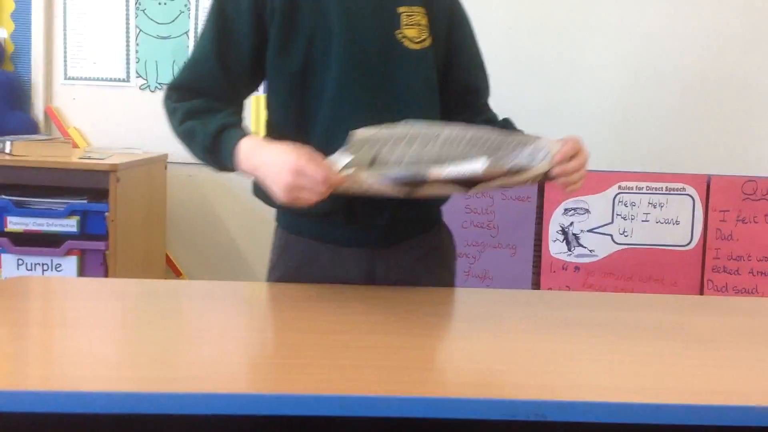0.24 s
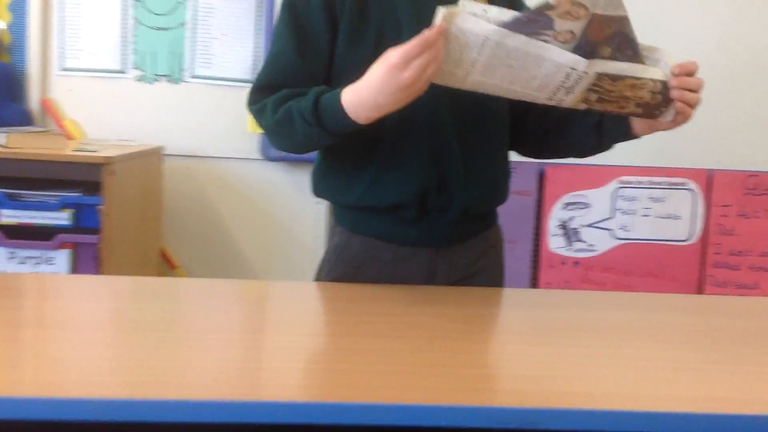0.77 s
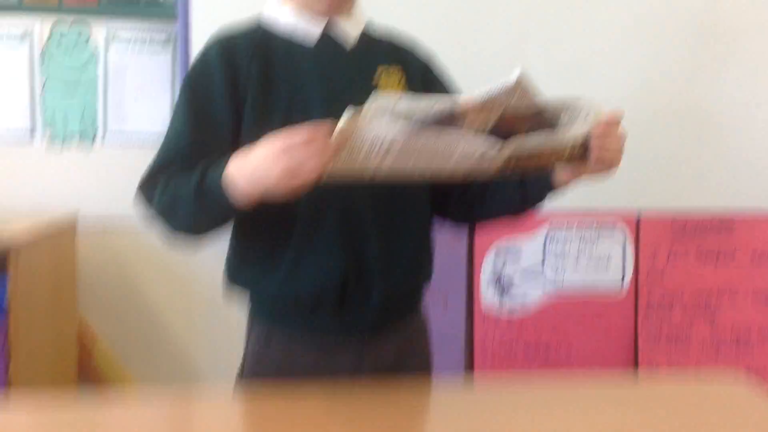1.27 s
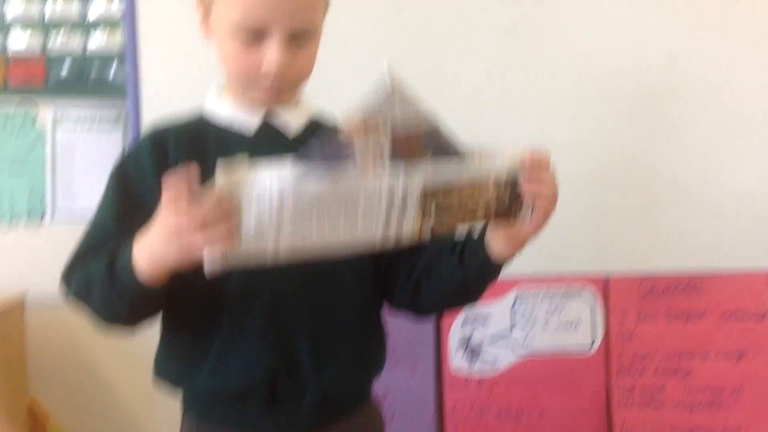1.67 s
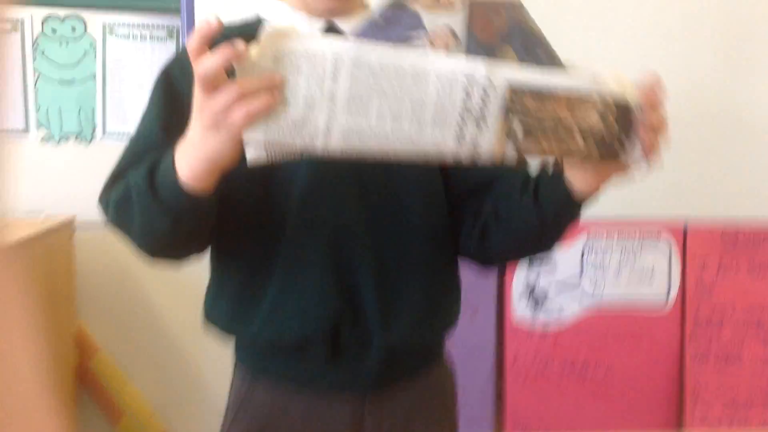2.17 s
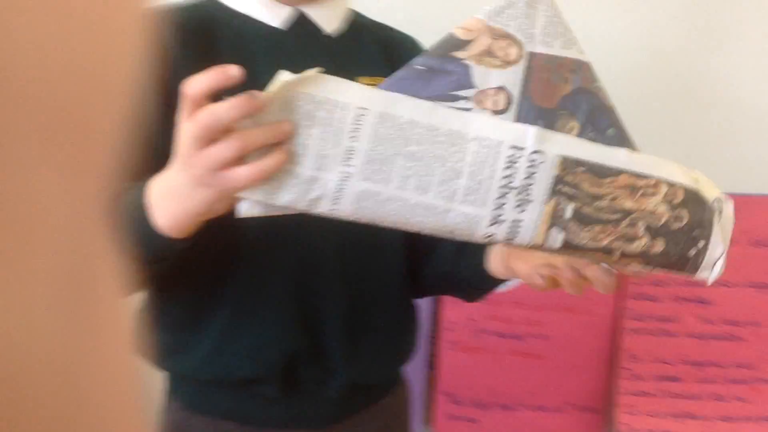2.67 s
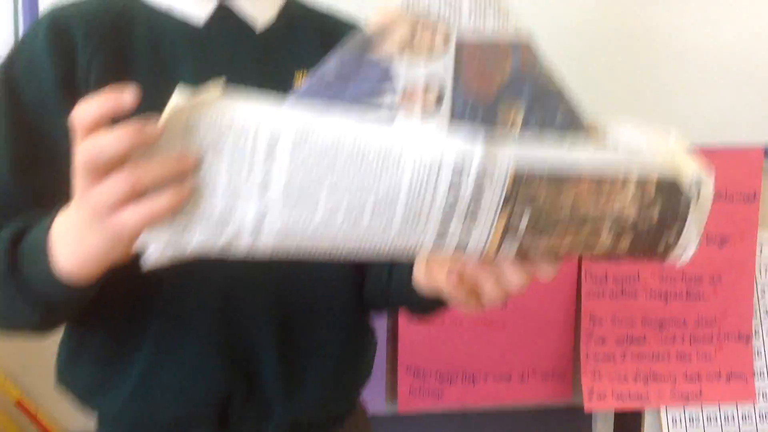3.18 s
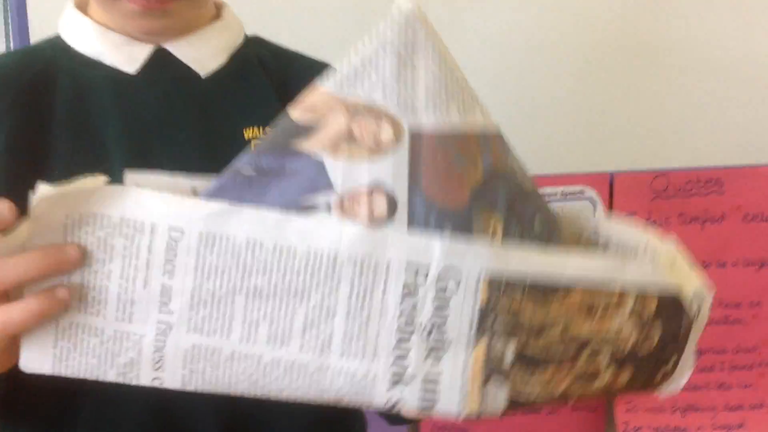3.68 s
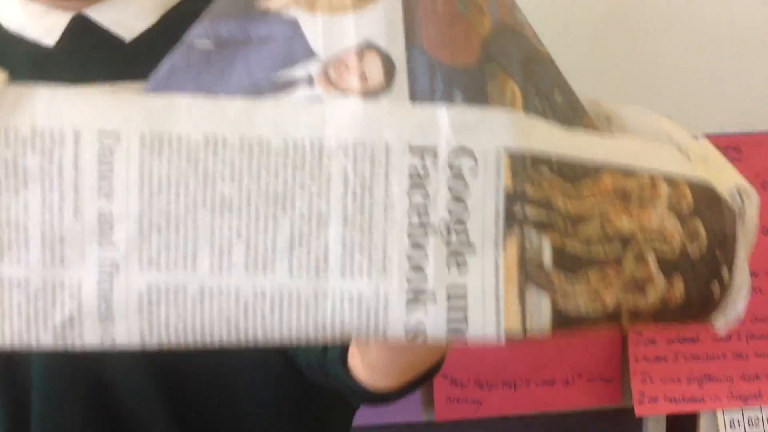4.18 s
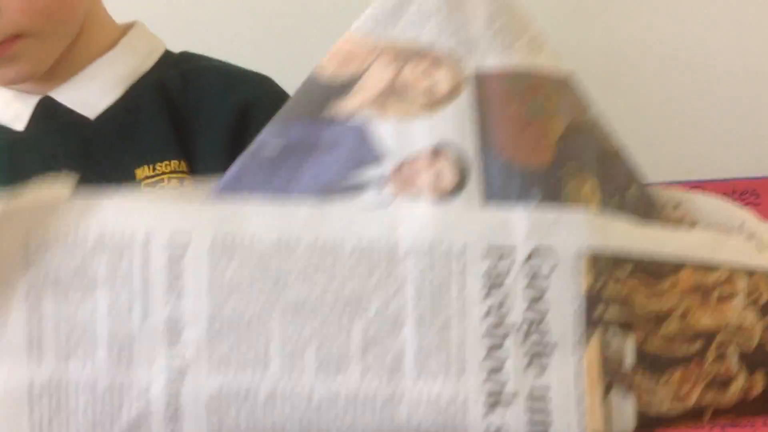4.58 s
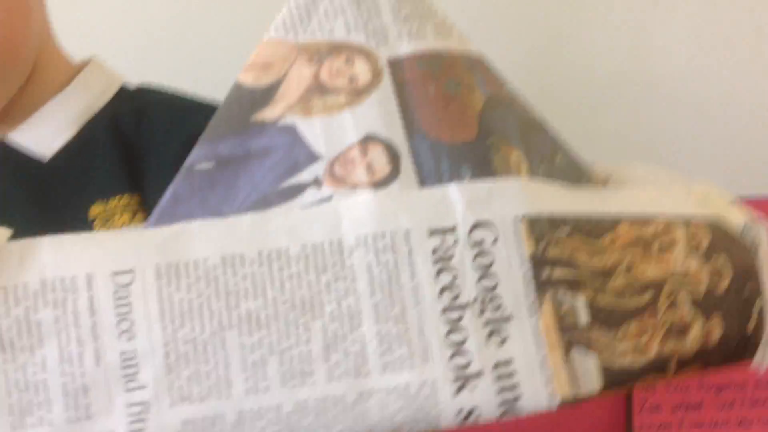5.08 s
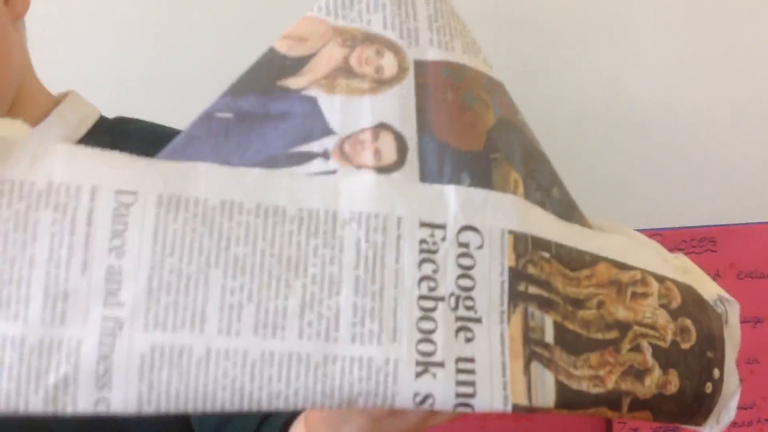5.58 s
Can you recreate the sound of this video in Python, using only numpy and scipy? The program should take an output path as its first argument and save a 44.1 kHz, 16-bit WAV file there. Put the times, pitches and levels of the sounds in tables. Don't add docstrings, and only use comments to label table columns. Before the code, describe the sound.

Crisp newspaper rustle and snapping creases build to a hard crackling bend, then dull and settle, amid finger bumps on the recorder and faint room hum.

```python
import sys
import numpy as np
from scipy import signal
from scipy.fft import rfft, irfft, next_fast_len
from scipy.io import wavfile
from scipy.ndimage import uniform_filter1d

SR = 44100
rng = np.random.default_rng(int(sys.argv[2]) if len(sys.argv) > 2 else 0)


def nominal_scale(level):
    x = np.asarray(level, float) / 20
    return 10 ** x


def wrap_up_sound(samples):
    columns = np.atleast_2d(samples).T
    tamed = np.clip(columns, -1, 1)
    steps = np.round(tamed * 32767).astype(np.int16)
    wavfile.write(sys.argv[1], SR, steps)


N = 257544

# (time [s], peak level [dB], ringing
# pitch [Hz])
CREASE_SNAPS = [(0.049, -35, 6420), (0.1341, -30, 6590), (0.156, -29, 8200), (0.1615, -32, 6420),
                (0.269, -35, 8600), (0.7158, -36.5, 8100), (0.804, -37, 3800), (0.881, -36.5, 2840),
                (0.9562, -29.5, 2930), (0.9907, -36, 3700), (1.015, -26.5, 3950), (1.173, -34, 2930),
                (1.3012, -32, 3060), (1.324, -24.5, 3140), (1.3318, -27, 4910), (1.572, -31.5, 7500),
                (1.6255, -30, 1940), (1.6835, -32, 7110), (1.7975, -36.5, 2450), (1.8482, -32, 3240),
                (1.865, -35, 6160), (1.9307, -38, 3400), (1.971, -27, 6000), (2.012, -26.5, 2870),
                (2.0344, -24, 7360), (2.1093, -34, 4260), (2.4374, -34, 3100), (2.4573, -30.5, 4740),
                (2.4613, -18.5, 5500), (2.507, -29, 6550),
                (2.6482, -45, 2820), (2.715, -47, 3000), (2.798, -44, 2430), (2.81, -41, 2500),
              (2.8992, -43, 6550), (3.103, -32, 3350), (3.138, -33, 3700), (3.1778, -35, 2580),
              (3.2223, -21.5, 5140), (3.226, -24.5, 5100), (3.2695, -29.5, 3790), (3.2905, -29, 2250),
              (3.303, -30, 6290), (3.3216, -24, 3790), (3.395, -20, 4690), (3.399, -23, 3860),
              (3.4206, -27, 3530), (3.4352, -12.5, 4450), (3.5129, -14.5, 5900), (3.525, -21, 7920),
              (3.5517, -29, 5990), (3.628, -33, 5000), (3.654, -32, 3010), (3.66, -30.5, 6890),
              (3.6962, -33, 4950), (3.7295, -35, 5730), (3.747, -32, 5200), (3.7777, -31, 5340),
              (3.8018, -35, 4910),
                (3.8824, -25, 3060), (3.8848, -20, 5800), (3.9063, -21, 3450), (3.9157, -24, 3920),
                (3.9209, -21, 5170), (3.947, -28, 2840), (4.0105, -40, 3360), (4.0821, -38, 1690),
                (4.0979, -36, 2020), (4.1114, -16, 4130), (4.487, -44, 3750), (4.5399, -25.5, 2970),
                (4.587, -33.5, 3630), (4.8465, -42, 1460), (5.4791, -30.5, 3000), (5.511, -24, 3120),
                (5.521, -44, 1510), (5.5371, -29, 3570), (5.6368, -38, 3420)]
# (peak time [s], strength [dB],
# time to swell by 10 dB [s], time to fade by 10 dB [s])
SHEET_STROKES = [(0.0, -46, .05, .13), (0.136, -47, .004, .15), (0.268, -46.5, .06, .075),
                 (0.398, -52, .03, .18), (0.608, -55, .004, .6), (0.717, -51, .004, .2),
                 (0.805, -56, .03, .11), (0.957, -52, .004, .15), (1.017, -43.5, .004, .07),
                 (1.178, -49, .08, .2), (1.302, -46, .004, .1), (1.33, -41, .02, .062), (1.53, -58, .2, .2),
                 (1.646, -45, .025, .12), (1.811, -47, .07, .12), (1.972, -52, .004, .15),
                 (2.036, -48, .04, .08), (2.11, -55, .03, .2), (2.27, -52, .15, .15), (2.4, -59, .1, .1),
                 (2.464, -43.5, .012, .085), (2.66, -64, .15, .2),
                 (2.815, -58, .015, .14), (2.91, -57, .08, .08), (3.065, -50, .035, .5),
                (3.19, -52, .05, .05), (3.283, -42, .08, .3), (3.397, -43, .02, .1),
                (3.437, -36, .004, .055), (3.505, -46, .03, .05), (3.515, -42, .004, .1),
                (3.6, -51, .05, .05), (3.665, -51, .04, .12), (3.76, -49.5, .1, .3), (3.884, -41, .01, .05),
                (3.915, -39, .02, .075), (4.112, -48, .006, .085), (4.31, -55, .08, .045),
                (4.43, -55.5, .07, .15), (4.555, -57, .04, .14), (4.81, -52, .09, .1),
                (4.87, -53, .07, .09), (5.09, -60, .08, .1), (5.189, -54.5, .08, .055),
                (5.365, -56, .09, .06), (5.522, -57, .04, .12)]
# (time [s], treble level [dB])
FACING = [(0.0, 3), (0.9, 4), (0.96, -7), (1.02, 4), (1.3, 1), (2.3, 5), (2.45, -9), (2.95, -2),
          (3.07, -19), (3.27, -19), (3.44, -4), (3.53, 5), (3.69, 1), (3.9, -18), (4.08, -25), (4.112, -5),
          (4.18, -24), (5.84, -32)]
# (frequency [Hz], level [dB per Hz])
SHEET_COLOUR = [(710, -44), (1200, -21), (1370, -13.5), (1730, -2), (3480, 2.5), (4080, 1.5), (4920, 1),
                (6650, -5.5), (10000, -31.5), (13000, -53), (22000, -120)]
# (frequency [Hz], level [dB per Hz])
FIZZ_COLOUR = [(4120, -30), (7000, -10.5), (9880, -13.5), (11600, -13.5), (14800, -14), (15600, -30),
               (16400, -54)]
# (time [s], level [dB])
HAND_SHADE = [
    (1.85, -1.5),
    (2.0, -11),
    (2.6, -18),
    (3.4, -18),
    (3.55, -1.5),
    (3.8, -14),
]
# (time [s], flex peak level [dB], start pitch [Hz], ring [cycles], tick peak level [dB])
CASE_SLAPS = [(1.633, -17, 850, 0.6, -22), (1.6378, -1, 1020, 0.4, -10), (1.6395, -15, 520, 0.7, -14),
              (1.6508, -16.5, 1160, 0.55, -5), (1.6648, -6, 885, 0.4, -13), (1.8152, -20, 800, .5, -38),
              (1.8169, -17, 270, 0.7, -35), (2.3387, -13.5, 660, 0.75, -15), (3.6072, -30, 1500, .3, -22),
              (3.6095, -7.5, 1700, 0.45, 1.5), (3.6101, -18.5, 170, 1.05, -40),
              (4.989, -37, 1900, 2.4, -62)]
# (time [s], flex peak level [dB], start pitch [Hz], ring [cycles])
CASE_TAPS = [(0.52, -40, 900, .4), (1.048, -36, 305, 0.5), (1.4958, -30.5, 1270, 0.3),
             (1.608, -33.5, 515, 1.1), (1.63, -30, 800, .6), (1.6615, -25, 1300, 0.8),
             (1.667, -25.5, 303, 0.72), (1.793, -36, 293, 2.2), (1.8117, -25, 327, 0.37),
             (2.35, -38, 330, 1.1), (2.583, -42.5, 262, 0.5), (2.94, -43, 160, 1.6), (3.166, -43, 2500, .6),
             (3.1845, -36, 2210, 0.78), (3.191, -42, 2300, .6), (3.2097, -36, 450, 1.1),
             (3.214, -25.5, 438, 0.69), (3.219, -28, 161, 2.1), (3.3402, -27, 1100, 0.28),
             (3.3596, -26.5, 915, 0.31), (3.3738, -34, 900, 0.65), (3.39, -27.5, 1100, 0.25),
             (3.432, -24, 1080, 0.2), (3.4412, -24.5, 1010, 0.21), (3.4463, -24.5, 1000, 0.27),
             (3.575, -25, 576, 0.27), (3.5809, -24.5, 920, 0.2), (3.5895, -40, 3000, .4),
             (3.599, -23, 570, 1.7), (5.777, -49.5, 168.5, 0.86)]
# (time [s], rumble level [dB])
GRIP_PRESSURE = [
    (0.0, -61),
    (0.5, -66),
    (1.0, -62),
    (2.2, -62),
    (2.64, -66),
    (2.95, -62),
    (3.45, -57),
    (3.7, -65),
    (5.84, -68),
]
# (frequency [Hz], level [dB per Hz])
RUMBLE_COLOUR = [(24, -56), (40, 1), (145, -11.5), (184, -0.5), (215, 4.5), (301, 1.5), (391, -0.5),
                 (900, -3.5), (1170, -29), (1980, -120)]
# (frequency [Hz], t60 [s])
ROOM_DECAY = [(500, 0.37), (2000, .3), (5000, 0.24), (10000, 0.25), (16000, 0.24)]
# (frequency [Hz], level [dB per Hz])
STILL_COLOUR = [(25, -15), (40, -13), (70, -16), (150, -3), (210, -9), (530, -10), (1100, -13.5),
                (2700, -12.5), (4700, -14.5), (9000, -19.5), (15000, -21.5), (16400, -13.5)]
# (frequency [Hz], level [dB])
MIC_RESPONSE = [(30, -30), (70, -14), (130, -3), (200, 0), (15100, 0), (15500, -24), (16300, -28),
                (16700, -70), (22050, -90)]

USUAL_DB = -52


def evened(x):
    return x / np.sqrt(np.mean(x ** 2) + 1e-20)


def read(points, hz):
    f, value = np.transpose(points)
    return np.interp(np.log(hz + 1), np.log(f + 1), value)


def follow(points, s):
    return np.interp(s, *np.transpose(points))


def add(mix, s, sound):
    part = mix[round(s * SR):][:len(sound)]
    part += sound[:len(part)]


def coloured(x, points):
    size = next_fast_len(len(x))
    gain = nominal_scale(read(points, np.fft.rfftfreq(size, 1 / SR)))
    return evened(irfft(rfft(x, size) * gain, size)[:len(x)])


def band(x, lo_hz, hi_hz):
    sos = signal.butter(2, [lo_hz, min(hi_hz, .45 * SR)], "band", fs=SR, output="sos")
    return signal.sosfilt(sos, x)


def grains(per_s, spread_db, ring_s, smooth, clump_db):
    size = nominal_scale(spread_db * np.minimum(rng.exponential(1, N), 4))
    slips = size * (rng.random(N) < per_s / SR)
    puffs = evened(signal.lfilter([1], [1, -np.exp(-1 / (ring_s * SR))], slips))
    clumps = evened(uniform_filter1d(uniform_filter1d(rng.standard_normal(N), 500), 500))
    return (puffs + smooth) * nominal_scale(clump_db * clumps) * rng.standard_normal(N)


def stroke_strength(pace):
    t = np.arange(0, N + 64, 64) / SR
    s, db, swell_s, fade_s = np.transpose(SHEET_STROKES)[:, :, None]
    drop_db = 10 * pace * np.maximum((s - t) / swell_s, (t - s) / fade_s)
    power = nominal_scale(2 * (db - drop_db)).sum(0)
    return np.interp(np.arange(N) / SR, t, 10 * np.log10(power + 1e-12))


def snaps():
    rows = CREASE_SNAPS
    out, t = np.zeros(N), np.arange(1500) / SR
    noise = rng.standard_normal((len(rows), 1501))
    motion_db = stroke_strength(1) - USUAL_DB
    for (s, db, hz), draws in zip(rows, noise):
        chance, hiss = draws[0], draws[1:]
        facing_db = follow(FACING, s)
        treble_db = -12 + 1.05 * facing_db
        body_db = -18 - 4.5 * np.log2(hz / 4000) - .25 * (db + 30) - .28 * facing_db
        shiver_db = -19 + 2.5 * chance + .55 * motion_db[round(s * SR)]
        decay = np.exp(-t / 0.0021) + nominal_scale(shiver_db + 9.5) * np.exp(-t / 0.0087)
        burst = hiss * decay + 7.7 * (t == 0)
        ring = np.sin(2 * np.pi * hz * t) * np.exp(-t * hz / 2.6)
        edge_hz = 9400 + 105 * treble_db
        wide = band(band(burst, 1400, edge_hz), 1400, edge_hz)
        top = band(band(burst, 7500, 15000), 7500, 15000)
        low = band(burst, 930, 1600)
        wide, top, low = (part / abs(part).max() for part in (wide, top, low))
        crease = 1.15 * ring + 1.065 * wide + nominal_scale(treble_db + 5.4) * top + nominal_scale(body_db) * low
        add(out, s, nominal_scale(db) * crease)
    return out


def rustle():
    strength_db = stroke_strength(1)
    facing_db = follow(FACING, np.arange(N) / SR)
    treble_db = facing_db + stroke_strength(pace=1.65) - strength_db
    body_db = -9.5 - .4 * (strength_db - USUAL_DB) + .07 * facing_db
    slips = grains(per_s=330, spread_db=3.0, ring_s=.0008, smooth=1.9, clump_db=1.3)
    middle = coloured(slips, SHEET_COLOUR)
    top = nominal_scale(treble_db) * coloured(slips, FIZZ_COLOUR)
    low = nominal_scale(body_db) * evened(band(slips, 410, 1835))
    return nominal_scale(strength_db) * (middle + top + low)


def knocks():
    out, t = np.zeros(N), np.arange(2000) / SR
    rows = list(CASE_SLAPS)
    for s, db, hz, cycles in CASE_TAPS:
        rows.append((s, db, hz, cycles, db - 9 + 9 * np.log2(hz / 1000)))
    noise = rng.standard_normal((len(rows), 2000))
    for (s, db, hz, cycles, tick_db), hiss in zip(rows, noise):
        turns = 2.5 * np.log1p(t * hz / 2.16)
        swell = 1 - np.exp(-turns / 0.1)
        flex = -np.sin(2 * np.pi * turns) * np.exp(-turns / cycles - t / 0.017) * swell
        flex += evened(band(hiss, 157, 890)) * np.exp(-t / 0.0066) * 0.035
        edge_hz = np.clip(10000 + 600 * (tick_db - db), 4500, 15000)
        contact = hiss * (np.exp(-t / .0001) + .02 * np.exp(-t / .0015)) + 2 * (t == 0)
        tick = band(contact, 1100, edge_hz)
        add(out, s, nominal_scale(db) * flex / abs(flex).max() + nominal_scale(tick_db) * tick / abs(tick).max())
    scrape = band(rng.standard_normal(1200), 520, 4200) * np.hanning(1200) ** 2
    add(out, 1.803, nominal_scale(-25.5) * scrape)
    return band(out, 103, 17000)


def grip():
    pressure_db = follow(GRIP_PRESSURE, np.arange(N) / SR)
    slips = grains(per_s=58, spread_db=5.3, ring_s=0.0055, smooth=2.3, clump_db=1.5)
    return nominal_scale(pressure_db) * coloured(slips, RUMBLE_COLOUR)


def classroom(x):
    taps = np.zeros(SR // 2)
    at = np.arange(140, SR // 2 - 20, 20)
    taps[at + rng.integers(0, 20, len(at))] = rng.choice([-1., 1.], len(at))
    hz, t, z = signal.stft(taps, SR, nperseg=256)
    decay_db = -60 * t / read(ROOM_DECAY, hz)[:, None]
    tail = signal.istft(z * nominal_scale(decay_db), SR, nperseg=256)[1]
    return signal.fftconvolve(x, tail / np.linalg.norm(tail))[:N]


def still_room():
    vent_hz = 212.7
    hum = evened(band(rng.standard_normal(N), vent_hz - 12, vent_hz + 12))
    hiss = coloured(rng.standard_normal(N), STILL_COLOUR)
    return nominal_scale(-61.5) * hiss + nominal_scale(-71.5) * hum


def scene():
    creases = snaps()
    creases = creases + nominal_scale(-16.5) * classroom(creases)
    hz, t, (sharp, soft) = signal.stft([creases, rustle()], SR, nperseg=512)
    shade_db = follow(HAND_SHADE, t) * np.clip((hz[:, None] - 9500) / 3500, 0, 1)
    patches = uniform_filter1d(rng.standard_normal(soft.shape), 9, axis=0)
    patches = evened(uniform_filter1d(patches, 4, axis=1))
    flutter = nominal_scale(1.8 * patches)
    paper = signal.istft((sharp + soft * flutter) * nominal_scale(shade_db), SR, nperseg=512)[1][:N]
    return (paper + knocks() + grip() + still_room())[None]


def top_cut(x):
    return signal.sosfilt(signal.butter(12, 16520, fs=SR, output="sos"), x)


def record(dry):
    log_gain = np.log(nominal_scale(read(MIC_RESPONSE, np.linspace(0, SR / 2, 2049))))
    circle = np.r_[log_gain, log_gain[-2:0:-1]]
    taps = np.fft.ifft(np.exp(np.conj(signal.hilbert(circle)))).real
    limited = np.clip(dry, -.66, .66)
    mix = signal.oaconvolve(limited, taps[None])[:, :N]
    return top_cut(mix)


dry = scene()
out = record(dry)
wrap_up_sound(out)
```